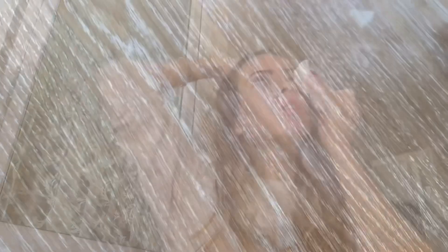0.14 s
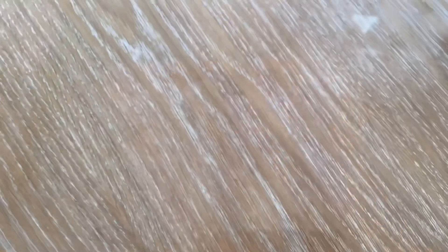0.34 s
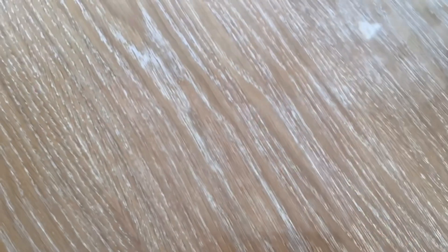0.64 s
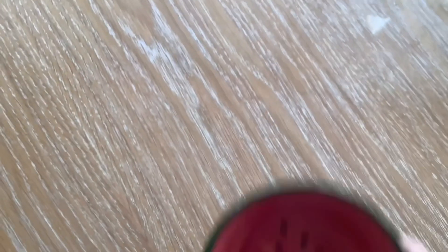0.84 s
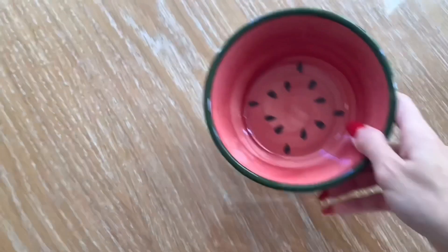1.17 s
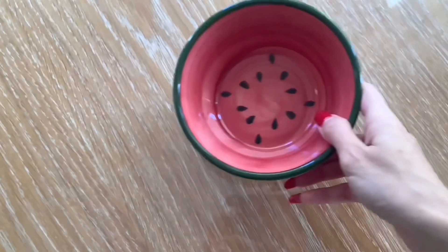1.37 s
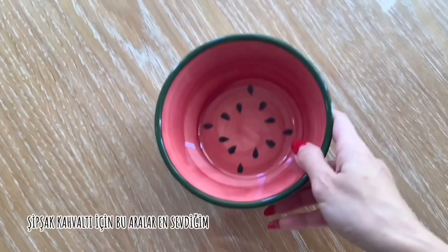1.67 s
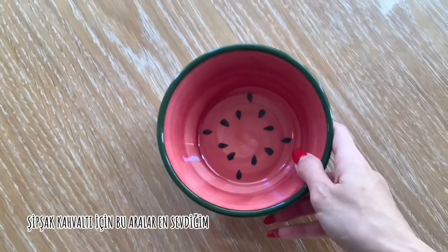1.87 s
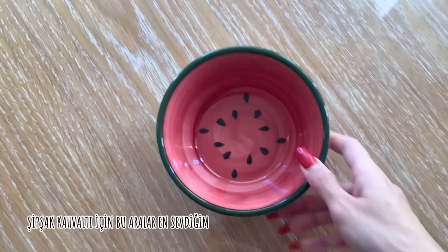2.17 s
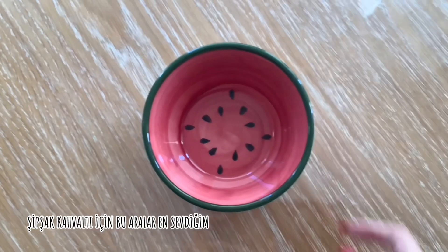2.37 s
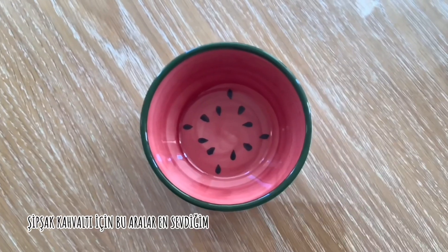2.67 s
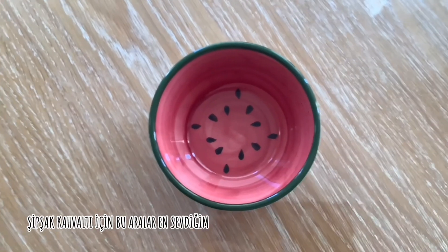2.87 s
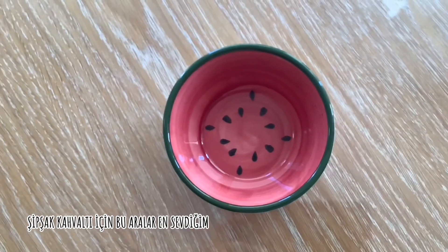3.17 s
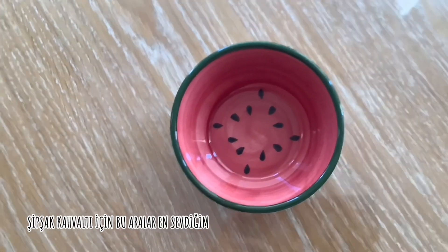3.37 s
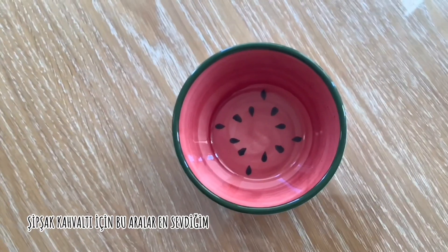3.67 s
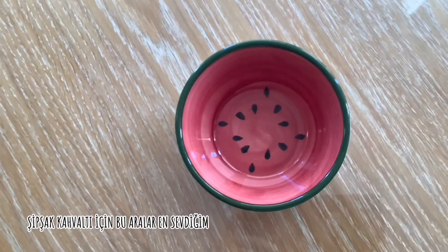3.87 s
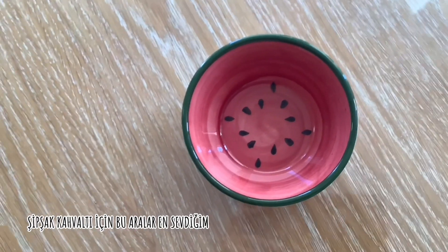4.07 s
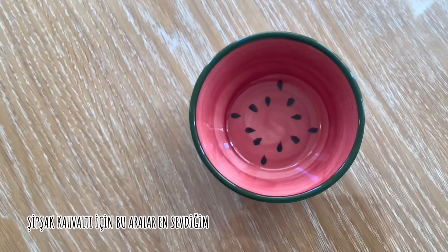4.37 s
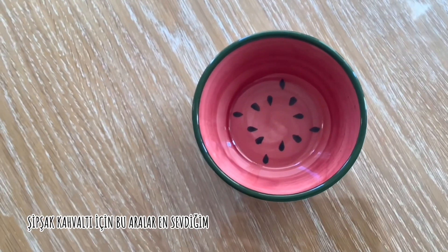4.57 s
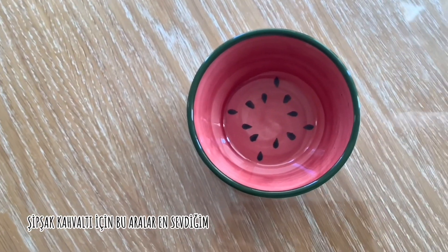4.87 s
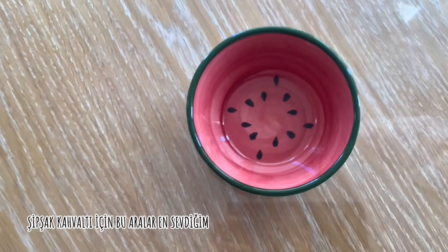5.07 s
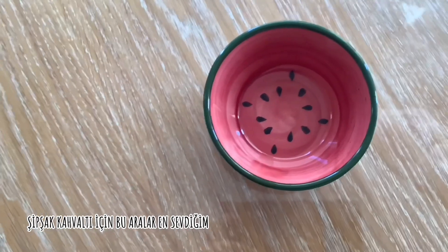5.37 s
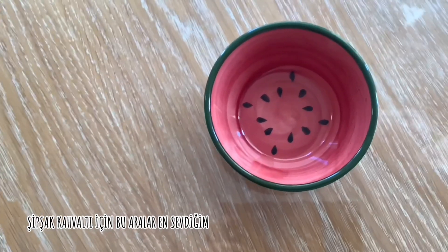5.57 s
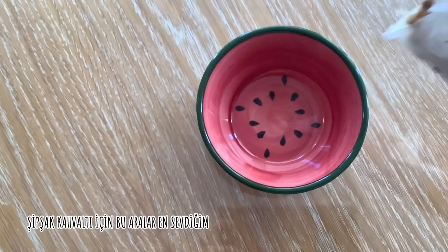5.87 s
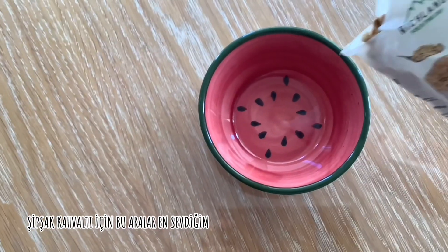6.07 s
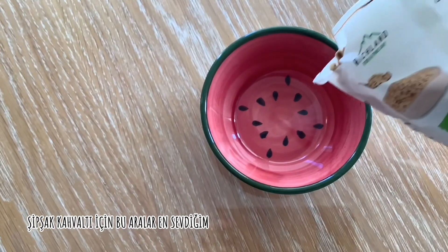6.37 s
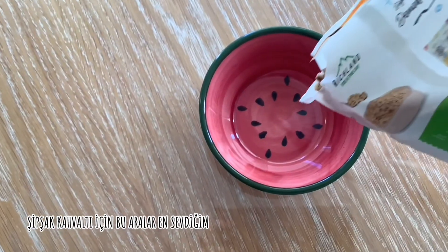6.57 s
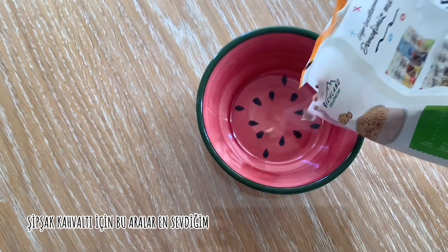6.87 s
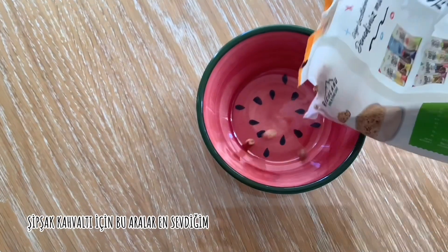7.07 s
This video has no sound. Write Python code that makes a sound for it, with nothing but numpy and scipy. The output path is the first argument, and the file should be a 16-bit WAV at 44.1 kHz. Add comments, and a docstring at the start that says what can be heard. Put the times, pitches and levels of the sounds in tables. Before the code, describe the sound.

Faint rumble, skin brushing and thin hiss sit under dull, slightly chirping knocks on a table. A bowl touches down twice, the wood resonating briefly, and a loud knock follows. Then dry puffs rustle and slump inside a crackling bag, settle, and finally trickle into the bowl in a quickly building patter. Close, mono, small dry kitchen with a short diffuse tail.

```python
"""Soft knocks stutter, then hands knock on a wooden kitchen table while fingers rub it: blows spread into falling chirps.
A ceramic bowl lands in two clacks and the table top rings as decaying modes over a noise thicket.
A plastic bag of puffed cereal is lifted: film snaps as noise cracks, puffs scrape as dense random clicks.
The bag tips, the flow builds, and the first puffs ping the bowl's high modes.
Throughout: low rumble, skin and sleeve brushing, fluttering hiss, even microphone noise."""
import sys
import numpy as np
from scipy import signal
from scipy.fft import rfft, irfft, next_fast_len
from scipy.io import wavfile

SR = 44100
rng = np.random.default_rng(int(sys.argv[2]) if len(sys.argv) > 2 else 0)


def pcm_store(signal):
    """Save signal as 16-bit PCM."""
    levels = np.round(np.clip(np.atleast_2d(signal), -1, 1) * 32767)
    wavfile.write(sys.argv[1], SR, levels.astype(np.int16).T)


N = 318843
T = np.arange(N) / SR

# Bowl foot landings. Each row: start in seconds, clack peak in dB, contact frequency in Hz,
# table ring gain in dB, ring low-pass cut-off in Hz.
LANDINGS = [(1.6924, -9.5, 390, -25.5, 550), (1.941, -11.5, 435, -26.5, 802)]
# Table top modes. Each row: frequency in Hz, level before scatter in dB, t60 in seconds.
TABLE_MODES = [(123, 2.5, 0.9), (206, 0.5, 0.51), (246.5, -5, 0.78), (264, -1, 0.63), (376, -9, 0.91),
               (465, -4, 0.53), (497, -1.5, .5), (570, -2, 0.45), (668, -8.5, 0.23), (780, -28.5, 0.44),
               (795, -17, 0.87), (994, -27.5, .45), (1235, -17, 0.33), (1497, -28, 0.29), (2120, 1, 0.15)]
# Light knocks. Each row: start in seconds, chirp peak in dB, contact frequency in Hz, click in dB re chirp,
# bass cut-off in Hz, centre in Hz of the band the struck spot leaves nearly still.
KNOCKS = [(0.8126, -33, 273, -3.5, 150, 254), (0.912, -20, 450, -24, 100, 287),
          (0.9313, -30.5, 294, -32, 150, 250), (1.0890, -13.5, 750, -12, 90, 325),
          (1.1984, -25, 340, -13, 150, 250), (1.4624, -22.5, 304, -38, 150, 165),
          (2.2214, -32.5, 390, -26, 200, 249), (2.3820, -2, 530, -21, 356, 245),
          (2.5464, -25, 520, -38, 110, 343), (2.7848, -33.5, 322, -35, 150, 248),
          (3.2358, -34, 304, -35, 150, 250), (3.2793, -18, 386, -12.5, 160, 205),
          (3.3623, -13, 424, -38, 340, 237), (3.84, -32, 300, -40, 150, 200),
          (4.4916, -18, 417, -17, 170, 223), (4.6153, -23, 253, -29, 100, 327),
          (5.232, -22, 556, -17.5, 130, 336), (5.322, -23, 310, -35, 121, 374),
          (5.7580, -38.5, 248, -35, 100, 353), (5.829, -36.5, 273, -23, 130, 350),
          (6.1446, -37, 250, -31, 130, 350), (6.8708, -28.5, 352, -30, 120, 260)]
# Bowl modes damped by hand and table. Each row: frequency in Hz, level before scatter in dB, t60 in seconds.
HELD_BOWL_MODES = [(1535, 1, 0.045), (1725, 0, 0.02), (2060, 1.5, 0.021), (2575, -4.5, 0.023),
                   (3640, -4.5, 0.016)]
# Bag lifted, carried, held still. Each row: time in seconds, level of the shifting cereal in dB.
CARRY = [(3.49, -58), (3.57, -42), (4.2, -38.5), (4.3, -45.5), (4.39, -42), (4.8, -47), (4.93, -51),
         (5.02, -61.5), (5.45, -74)]
# Load slumping in the bag. Each row: crest in seconds, level in dB, time to fall 20 dB in seconds.
SLUMPS = [(3.605, -30.5, 0.14), (3.83, -39.5, .12), (4.04, -32.5, 0.2258), (4.098, -25.5, 0.0919),
          (4.76, -47.5, 0.18), (5.19, -61, 0.46), (5.565, -61, 0.04), (5.735, -55.5, .13), (5.8, -55, 0.27),
          (6.66, -41.5, 0.22), (7.0, -45, 0.2), (7.21, -42.5, 0.44)]
# Spectra of the moving cereal, lifted and pouring. Each row: frequency in Hz, relative gain in dB.
LIFT_COLOUR = [(250, -7), (400, -3), (650, -3.5), (1000, -2.5), (1600, -3), (2000, -2), (2600, 2.5),
               (3300, -4), (4300, -6), (5700, -11), (7500, -8.5), (10000, -12), (12000, -28), (16000, -38)]
POUR_COLOUR = [(250, 1), (450, 1.5), (850, 3.5), (1150, -0.5), (1600, -1), (2400, 2.5), (3400, -5),
               (4800, -6), (5800, -11.5), (7500, -10), (10000, -14.5), (12000, -26), (16000, -37)]
# Film folds snapping over. Each row: start in seconds, peak in dB, reference frequency in Hz, t60 in seconds.
SNAPS = [(3.5109, -31.5, 2980, 0.019), (3.5463, -15.5, 3230, 0.0092), (3.631, -21, 3000, 0.0047),
         (3.812, -21, 2600, 0.013), (3.8212, -22, 2200, 0.004), (3.8536, -15, 3500, 0.013),
         (3.893, -9, 4000, 0.0058), (3.896, -13, 4200, 0.0032), (4.058, -14.5, 2940, 0.045),
         (4.0863, -14, 4440, 0.019), (4.0930, -15, 1690, 0.037), (4.2608, -16, 3400, 0.01),
         (4.3652, -13, 4700, 0.011), (4.459, -22.5, 2510, .025), (4.4746, -9.5, 3840, 0.0075),
         (4.494, -20, 4000, 0.0061), (4.6130, -26.5, 2620, 0.042), (5.039, -40, 2800, 0.044),
         (5.4120, -44.5, 2600, 0.023), (5.4560, -43, 2210, 0.05), (5.6975, -23, 1600, 0.011),
         (5.6987, -26.5, 5900, 0.014), (5.784, -36, 3000, 0.022), (6.1734, -38.5, 2470, 0.017),
         (6.4204, -28, 6670, 0.022), (6.5390, -23.5, 4000, 0.011), (6.6296, -12.5, 3000, 0.014),
         (6.962, -23, 13000, 0.019), (7.003, -27, 4000, 0.041), (7.0812, -19.5, 4400, 0.061),
         (7.0900, -25.5, 3830, 0.26)]
# Puffs hitting the bare bowl. Each row: start in seconds, ring gain in dB, tilt in dB per octave about 7 kHz.
PINGS = [(6.822, -48, -16), (6.848, -47, -4), (6.917, -45, 4), (7.083, -36, -0.5), (7.150, -39.5, 1),
         (7.218, -51, 0)]
# Bowl wall modes. Each row: frequency in Hz, level before tilt and scatter in dB, t60 in seconds.
BOWL_WALL_MODES = [(4735, 6.5, 0.062), (7305, 4, 0.063), (9340, 2, 0.07), (9200, -11, 0.1),
                   (12790, -19, .15)]
# Finger rubs on bowl and table. Each row: crest in seconds, level in dB, time to fall 20 dB in seconds.
RUBS = [(.55, -68, 1.1), (1.0, -65, .5), (1.33, -58.5, 0.63), (1.74, -61, 0.25), (2.15, -68.5, .3),
        (2.42, -61.5, 0.5), (2.57, -66.5, 0.57), (3.35, -59.5, 0.46)]
# Faint dry handling ticks and scuffs. Each row: start in seconds, peak in dB, t60 in seconds.
TICKS = [(0.1317, -41, 0.013), (0.1608, -41, 0.0041), (0.4715, -36, 0.0077), (0.82, -49, 0.32),
         (1.201, -53, 0.21), (1.6163, -42.5, 0.003), (2.5705, -40.5, 0.0082), (2.599, -52, 0.073),
         (2.7156, -49, 0.073), (2.732, -48, 0.068), (3.284, -39.5, 0.1)]
# Unrest of the hand holding the microphone. Each row: time in seconds, relative rumble level in dB.
UNREST = [(0, -51), (.55, -49), (1, -42), (1.65, -47), (2.3, -43.5), (2.95, -46.5), (4.1, -46),
          (4.7, -55.5), (7.23, -56)]
# Spectra of rumble, brushing, finger slide and hiss. Each row: frequency in Hz, relative gain in dB.
RUMBLE_COLOUR = [(24, -35), (32, -22), (40, -4.5), (50, -6), (66, 1.5), (90, -5), (130, -7.5), (170, -14.5),
                 (250, -25), (400, -48.5)]
BRUSH_COLOUR = [(100, -13), (200, -0.5), (400, -5), (700, -11.5), (1200, -25), (2500, -29.5)]
SLIDE_COLOUR = [(500, 4.5), (1000, 5.5), (2000, 6.5), (3300, 3), (5000, -10.5), (8000, -19.5)]
HISS_COLOUR = [(2000, -7), (4000, -4), (5500, -11), (7500, -2.5), (9600, 0), (11500, -10.5), (13000, -16),
               (16000, -23)]

STUTTER_START_S, STUTTER_GAP_S, STUTTER_MEAN_PEAK_DB, STUTTER_CONTACT_HZ = 0.029, 0.0145, -34, 370
POUR_START_S, POUR_FULL_S, POUR_DB, POUR_RISE_DB_PER_S = 6.16, 6.566, -43, 45.5
SLUMP_RISE_SHARE, RUB_RISE_SHARE = 0.68, 0.98  # rise time over fall time
TREBLE_REF_DB, TREBLE_DB_PER_DB = -40, 0.27  # harder motion is brighter
RUB_REST_DB = -75  # the resting hand still slides a little
SLEEVE_DB, BRUSH_RE_RUB_DB, BRUSH_RE_BAG_DB = -61.5, 9, -11
HISS_REST_DB, HISS_DB_PER_RUB_DB = -70.5, 0.4068
FLUTTER_HZ, FLUTTER_OFFSET_S, FLUTTER_DECAY_S = 29.97, 0.0133, 0.0013
MICROPHONE_NOISE_DB = -75.5
TOP_HZ = 15900


def landings(size=44100):
    """The bowl's foot clacks, one side then the other; its weight rings clear modes over a thicket of close ones."""
    out = np.zeros(N)
    for s, peak_db, contact_hz, ring_db, top_hz in LANDINGS:
        add(out, s, peak(bending_wave(contact_hz), peak_db))
        add(out, s + 0.0018, peak(crack(0.015, [700, 2200]), peak_db - 27))
        thicket = unit(butter(rng.standard_normal(size), [250, 900], "band", order=1))
        two_stage_decay = undb(3.5) * fade(0.49, size) + undb(6.5) * fade(0.065, size)
        thicket = butter(thicket, 93, "high") * two_stage_decay
        build_up = 1 - np.exp(-T[:size] / 0.0017)  # edge reflections take a moment to fill the board
        table = (ring(TABLE_MODES, 0.95, size) + thicket) * build_up
        add(out, s + 0.00287, undb(ring_db) * butter(table, top_hz, "low"))
    return out


def knocks(size=4096):
    """Each knock is a chirp and its duller edge reflection; a hard contact also clicks and briefly rings the bowl."""
    out = np.zeros(N)
    for s, peak_db, contact_hz, click_db, bass_hz, node_hz in KNOCKS:
        direct = bending_wave(contact_hz, bass_hz=bass_hz, node_hz=node_hz)
        reflection = bending_wave(0.3 * contact_hz, bass_hz=bass_hz, node_hz=node_hz)
        add(out, s, peak(direct, peak_db))
        add(out, s + 0.00426, peak(reflection, peak_db - 17.5))
        add(out, s + 0.00199, peak(crack(0.0031, [1500, 9000]), peak_db + click_db))
        bowl_gain = undb(peak_db + click_db - 5.5) * contact_hz / 600
        add(out, s + 0.0021, bowl_gain * ring(HELD_BOWL_MODES, 0.5, size))
    return out


def stutter(count=5):
    """Soft knocks follow each other almost evenly, like a contact that sticks and slips."""
    out = np.zeros(N)
    for k, (late, strength) in enumerate(rng.standard_normal((count, 2))):
        start_s = STUTTER_START_S + STUTTER_GAP_S * (k + 0.13 * late)
        add(out, start_s, peak(bending_wave(STUTTER_CONTACT_HZ), STUTTER_MEAN_PEAK_DB + 0.95 * strength))
    return out


def bending_wave(contact_hz, travel_s=0.003607, bass_hz=150, edge_hz=1200, node_hz=250, node_db=-7, size=2048):
    """A blow spread into a falling chirp: delay goes as 1 / sqrt(frequency), travel_s at 1 kHz."""
    def path(f):
        contact = (f / contact_hz) / (1 + (f / contact_hz) ** 4)
        board = f ** 2 / (f ** 2 + bass_hz ** 2) / np.sqrt(1 + (f / edge_hz) ** 10)
        node = undb(node_db * np.exp(-(np.log(f / node_hz) / 0.12) ** 2))  # board nearly still in this band
        dispersion = np.exp(-4j * np.pi * travel_s * np.sqrt(1000 * f))
        return contact * board * node * 1j * dispersion
    return shape(signal.unit_impulse(size), path)


def shifting_cereal(start_s, end_s, points, rate_hz, spread_db, body_db, treble_db, crinkle_db):
    """Puffs scrape in a dense stream of tiny clicks; puffs and creases crackle over it in four bands."""
    level_db = cereal_db()
    top_db = level_db + TREBLE_DB_PER_DB * (level_db - TREBLE_REF_DB)
    crinkle = 0
    for band_hz in [(500, 1400), (1400, 3000), (3000, 6000), (6000, 15000)]:
        bursts = signal.fftconvolve(grains(130, 2.5) ** 2, fade(0.007, 512))[:N]
        crackle = unit(np.sqrt(np.abs(bursts)) * rng.standard_normal(N))
        crinkle = crinkle + butter(crackle, band_hz, "band")
    stream = grains(rate_hz, spread_db) * undb(1.2 * walk(28))
    clicks = colour(stream + undb(crinkle_db) * crinkle, points)
    treble = shape(clicks, lambda f: 1 / (1 + (6000 / f) ** 8))
    body = unit(clicks - treble) * undb(level_db + body_db)
    treble = unit(treble) * undb(top_db + treble_db)
    moving = np.clip((T - start_s) / 0.0077, 0, 1) * np.clip((end_s - T) / 0.018 + 1, 0, 1)
    return moving * (body + treble)


def bag_db():
    """How strongly the hand moves the bag: carrying, then tipping until the flow is full."""
    pouring_db = POUR_DB - POUR_RISE_DB_PER_S * np.maximum(POUR_FULL_S - T, 0)
    return np.where(T < POUR_START_S, curve(CARRY), pouring_db)


def cereal_db():
    """How strongly the cereal moves: it follows the bag, with the slumps on top."""
    return 10 * np.log10(undb(bag_db()) ** 2 + swells(SLUMPS, SLUMP_RISE_SHARE))


def snaps():
    """A fold of film buckles with a short, broad crack."""
    out = np.zeros(N)
    for s, peak_db, hz, t60_s in SNAPS:
        add(out, s, peak(crack(t60_s, [hz * 0.42, hz * 1.22]), peak_db))
    return out


def pings(size=16384):
    """Light puffs wake only the bowl's high modes; a harder corner of the puff favours the highest."""
    out = np.zeros(N)
    for s, ring_db, tilt_db in PINGS:
        modes = [(hz, mode_db + tilt_db * np.log2(hz / 7000), t60_s) for hz, mode_db, t60_s in BOWL_WALL_MODES]
        add(out, s, undb(ring_db) * ring(modes, 1, size))
    return out


def kitchen(x, t60_s, wet_db, count=3, size=32768):
    """Add a short, diffuse tail whose treble lasts slightly longer; its pattern drifts at random."""
    weights = np.array([walk(5) for _ in range(count)])
    wet = np.zeros(N)
    for weight in weights / np.linalg.norm(weights, axis=0):
        noise = rng.standard_normal(size)
        low = butter(noise, 4900, "low") * fade(t60_s, size)
        high = butter(noise, 3100, "high", order=1) * fade(1.08 * t60_s, size)
        tail = (low + high) * np.clip(T[:size] / 0.0018, 0, 1)
        wet += signal.fftconvolve(x * weight, tail / np.linalg.norm(tail))[:N]
    return x + undb(wet_db) * wet


def rubbing_db():
    """How strongly the fingers rub: gestures over a resting level."""
    return 10 * np.log10(undb(RUB_REST_DB) ** 2 + swells(RUBS, RUB_RISE_SHARE))


def sliding_fingers():
    """Fingers slide over bowl and table: dense clicks that swell with the rubbing."""
    return unit(colour(grains(6000, 3.8), SLIDE_COLOUR)) * undb(rubbing_db())


def ticks():
    """Faint dry ticks and scuffs of handling, as high noise bursts."""
    out = np.zeros(N)
    for s, peak_db, t60_s in TICKS:
        add(out, s, peak(crack(t60_s, [3000, 12000]), peak_db))
    return out


def handling():
    """The hand-held microphone rumbles unevenly; skin and sleeve brush, more so with rubbing and bag motion."""
    rumble_db = curve(UNREST) + 4 + 2.47 * walk(8.3)
    bag = (T > CARRY[0][0]) * undb(bag_db() + BRUSH_RE_BAG_DB)
    brushing = np.sqrt(undb(SLEEVE_DB) ** 2 + undb(rubbing_db() + BRUSH_RE_RUB_DB) ** 2 + bag ** 2)
    rumble = unit(colour(rng.standard_normal(N), RUMBLE_COLOUR)) * undb(rumble_db)
    brush = unit(colour(rng.standard_normal(N), BRUSH_COLOUR)) * brushing * undb(1 + 2 * walk(18))
    return rumble + brush


def hiss():
    """Thin noise with sparse clicks flutters at a steady rate and swells as the fingers rub."""
    since_pulse_s = (T - FLUTTER_OFFSET_S) * FLUTTER_HZ % 1 / FLUTTER_HZ
    flutter = 1 + 2.2 * np.exp(-since_pulse_s / FLUTTER_DECAY_S)
    source = rng.standard_normal(N) * flutter + undb(-1.5) * grains(70, 3.5)
    level_db = HISS_REST_DB + HISS_DB_PER_RUB_DB * (rubbing_db() - RUB_REST_DB)
    return unit(colour(source, HISS_COLOUR)) * undb(level_db)


def faint_treble():
    """Finger slide and hiss recede by 9 dB once the bag is lifted; ticks lie on top."""
    recede_db = np.interp(T, [3.5, 4.8], [0, -9])
    return (sliding_fingers() + hiss()) * undb(recede_db) + ticks()


def microphone_noise():
    """The microphone's own even, faint white noise."""
    return undb(MICROPHONE_NOISE_DB) * rng.standard_normal(N)


def crack(t60_s, band_hz, size=4096):
    """A decaying noise burst in a broad band, with little above 11 kHz."""
    burst = butter(rng.standard_normal(size) * fade(t60_s, size), band_hz, "band", order=1)
    return butter(burst, 10500, "low", order=3)


def ring(modes, scatter_db, size):
    """Decaying modes; each blow lands elsewhere and weighs them anew, in level and sign."""
    chance = rng.standard_normal((len(modes), 2))
    out = np.zeros(size)
    for (hz, db, t60_s), (a, b) in zip(modes, chance):
        gain = undb(db + scatter_db * a) * np.sign(b)
        out += gain * np.sin(2 * np.pi * hz * T[:size]) * fade(t60_s, size)
    return out


def grains(rate_hz, spread_db):
    """Random clicks of rms 1, many small and a few large."""
    size = undb(spread_db * np.minimum(rng.exponential(size=N), 5))
    return unit((rng.random(N) < rate_hz / SR) * size * rng.choice([-1, 1], N))


def swells(rows, rise_share):
    """Summed power of gestures; each grows to its crest and dies away exponentially."""
    power = 0
    for s, db, fall_s in rows:
        distance_s = np.maximum((s - T) / rise_share, T - s)
        power = power + undb(db - 20 * distance_s / fall_s) ** 2
    return power


def walk(rate_hz):
    """Slow chance: normal random knots joined by lines."""
    knots = rng.standard_normal(2048)
    return np.interp(T * rate_hz, np.arange(len(knots)), knots)


def curve(rows):
    """A (seconds, value) table as a line in time."""
    s, values = np.transpose(rows)
    return np.interp(T, s, values)


def fade(t60_s, size):
    """Exponential decay by 60 dB in t60_s."""
    return np.exp(-np.log(1000) * T[:size] / t60_s)


def shape(x, gain):
    """Filter by a gain that is a function of frequency."""
    n = next_fast_len(len(x))
    hz = np.maximum(np.arange(n // 2 + 1) * SR / n, 1)
    return irfft(rfft(x, n) * gain(hz), n)[:len(x)]


def colour(x, points):
    """Filter by (Hz, dB) points, joined on a log frequency axis."""
    hz, db = np.transpose(points)
    return shape(x, lambda f: undb(np.interp(np.log(f), np.log(hz), db, left=-90, right=-90)))


def butter(x, hz, kind, order=2):
    """Causal low-, high- or band-pass."""
    sos = signal.butter(order, np.minimum(hz, SR * 7 / 15), kind, fs=SR, output="sos")
    return signal.sosfilt(sos, x)


def add(track, s, sound):
    """Mix a sound in at a time in seconds."""
    i = int(s * SR)
    track[i:i + len(sound)] += sound[:N - i]


def undb(db):
    """Decibels to gain."""
    return 10 ** (np.asarray(db) / 20)


def unit(x):
    """Scale to rms 1."""
    return x / np.sqrt(np.mean(x ** 2))


def peak(x, db):
    """Scale to a peak level in dB."""
    return x * undb(db) / np.abs(x).max()


def scene():
    """Cereal, snaps and pings sound in the kitchen; knocks and landings come straight through the solid."""
    lift = shifting_cereal(CARRY[0][0], POUR_START_S, LIFT_COLOUR, rate_hz=6000, spread_db=0.4,
                           body_db=0, treble_db=-11, crinkle_db=-3.5)
    pour = shifting_cereal(POUR_START_S, T[-1], POUR_COLOUR, rate_hz=3000, spread_db=2,
                           body_db=-0.5, treble_db=-7.5, crinkle_db=-2)
    solid = landings() + knocks() + stutter()
    airborne = kitchen(lift + pour, t60_s=0.17, wet_db=-8) + kitchen(snaps() + pings(), t60_s=0.13, wet_db=-5)
    background = handling() + faint_treble() + microphone_noise()
    return (solid + airborne + background)[None]


def record(dry):
    """A steep low-pass cuts everything above TOP_HZ."""
    return signal.sosfilt(signal.ellip(8, 0.2, 70, TOP_HZ, fs=SR, output="sos"), dry)


dry = scene()
out = record(dry)
pcm_store(out)
```